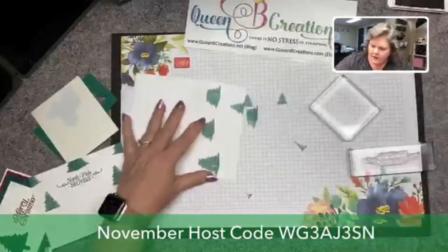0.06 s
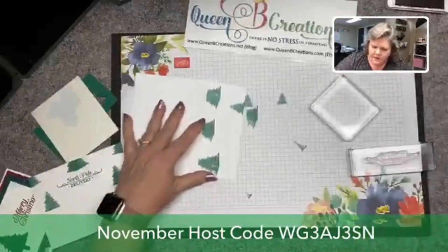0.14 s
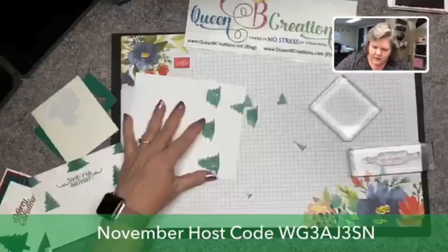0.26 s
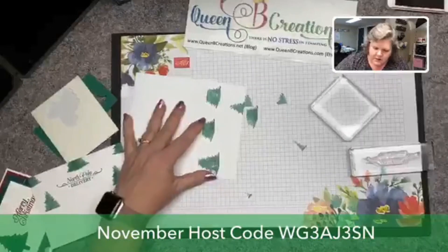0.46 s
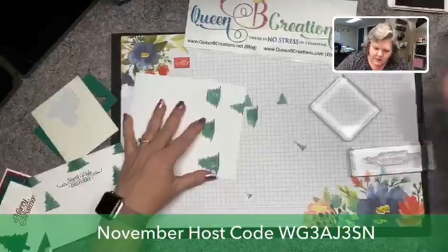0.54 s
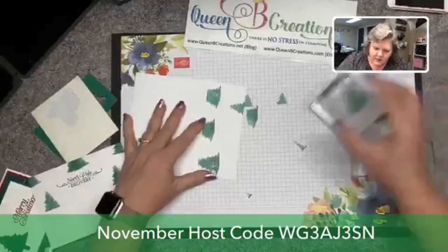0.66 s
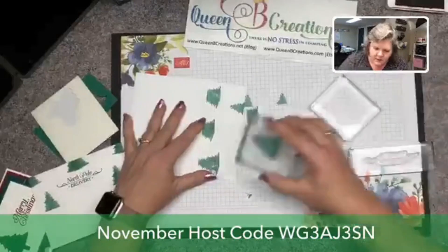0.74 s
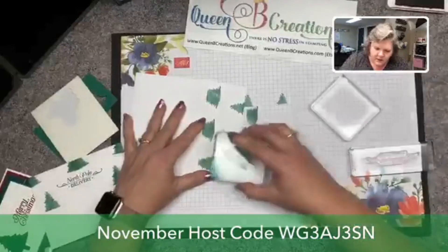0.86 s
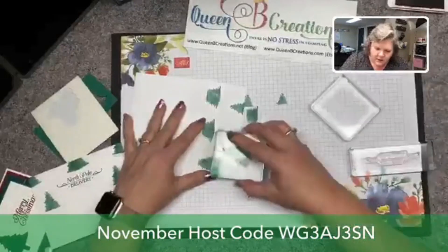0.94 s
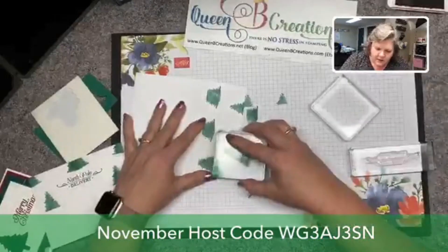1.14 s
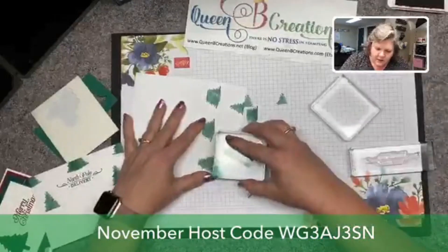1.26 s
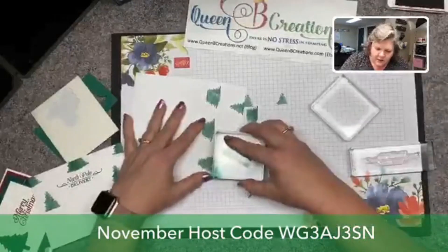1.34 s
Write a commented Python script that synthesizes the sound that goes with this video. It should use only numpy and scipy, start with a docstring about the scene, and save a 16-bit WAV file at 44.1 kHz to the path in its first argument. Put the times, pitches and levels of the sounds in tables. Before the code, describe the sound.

A hard acrylic stamp block thumps and knocks sharply twice on a craft desk, the second with a quick rebound, after faint fingernail ticks; then faint rubbing on paper, small room, close microphone with light hiss.

```python
"""An acrylic stamp block knocks on a craft desk in a small room: a thump that sets the desk wobbling,
then two sharp knocks, the second with a rebound; later it lands softly on paper.
Each contact is a burst of coloured noise with a rattle, plus dying sines for block and desk.
Two fingernail ticks come first, as narrow noise bursts; a faint low rubbing is filtered noise.
The room echo trails the direct sound closely, over steady room tone and microphone hiss."""
import sys
import numpy as np
from scipy import signal
from scipy.fft import rfft, irfft
from scipy.io import wavfile
from scipy.ndimage import uniform_filter1d

SR = 44100
rng = np.random.default_rng(int(sys.argv[2]) if len(sys.argv) > 2 else 0)


def digitize_waveform(pressure):
    """Quantize a signal to 16-bit integers and store it at the path in sys.argv[1].

    Rows of a 2-D input are taken as channels; values are limited to [-1, 1].
    """
    field = np.atleast_2d(pressure).T
    bounded = np.clip(field, -1, 1)
    quanta = np.round(bounded * 32767).astype(np.int16)
    wavfile.write(sys.argv[1], SR, quanta)


N = 61739

# Room tone and microphone hiss. Each row: frequency in Hz, relative density in dB per Hz.
FLOOR_COLOUR = [(15, -19.5), (35, -5.5), (55, 3.5), (130, -1.5), (350, -9), (600, -16), (1500, -17.5),
                (4000, -21), (9000, -26.5), (14500, -34.5), (16000, -34)]
FLOOR_DB = -62.5

# How fast the early echo dies away. Each row: frequency in Hz, decay by 60 dB in seconds.
ROOM_DECAY = [(100, 0.21), (300, 0.4441), (800, 0.1432), (2000, 0.2437), (5000, 0.1), (14000, 0.2328)]
# Colour of the early echo. Each row: frequency in Hz, relative level in dB.
ROOM_COLOUR = [(60, -8), (300, -2.5), (750, 1), (2000, -3), (5000, 2.5), (14000, -4)]
# Colour of the faint late echo. Each row: frequency in Hz, relative level in dB.
LATE_COLOUR = [(200, -22), (750, -26.5), (1100, -23.5), (1650, -20), (2400, -31), (3050, -22), (4500, -26),
               (12000, -47)]
LATE_T60_S = 0.87
ROOM_DB, ROOM_DELAY_S = -6.5, 0.0028  # echo level before each sound's own send, and its lag

# Rumble of the rubbing over time. Each row: time in seconds, level in dB.
RUB_LEVEL = [(0, -78.5), (0.7, -60), (0.85, -66.5), (0.96, -60.5), (1.02, -76.5), (1.1, -61), (1.19, -68),
             (1.301, -68.5), (1.4, -69.5)]
# Colour of that rumble. Each row: frequency in Hz, relative density in dB per Hz.
RUB_COLOUR = [(30, -23), (70, -2), (140, -1.5), (220, -4.5), (300, -4.5), (400, -11), (520, -18.5),
              (1500, -45), (8000, -65.5)]
# Wandering resonance of the rubbing. Each row: time in seconds, centre in Hz, level in dB.
RUB_NOTE = [(0.739, 250, -71), (0.831, 480.2, -70), (0.9, 305.8, -62), (0.959, 162.8, -62),
            (1.01, 139.4, -59), (1.06, 271.8, -64.5), (1.112, 285.5, -64), (1.19, 233, -88),
            (1.27, 280.8, -65), (1.318, 384.4, -66.5), (1.4, 358, -67.5)]
RUB_NOTE_WIDTH_HZ = 52

# Fingernail ticks. Each row: start in seconds, level in dB, centre in Hz, width in octaves.
TICKS = [(0.1285, -30, 3586, 0.18), (0.1290, -43.5, 2500, 0.42), (0.153, -45.5, 1505, 0.62)]
TICK_FALL_S, TICK_SKIRT_DB, TICK_ECHO_DB = 0.0024, -33.5, -7.5

# Slow flexing of the desk top under a push.
# Each row: start in seconds, level in dB, pitch in Hz, hold in seconds, decay by 60 dB in seconds.
PUSHES = [(0.198, -29, 57.7, 0.036, 0.25), (0.313, -47.5, 56.14, 0.058, 0.83),
          (0.493, -42.5, 53.1, .005, .8)]
FLEX_RISE_S = 0.0069

# Modes of the block and what it strikes.
# Each row: frequency in Hz, relative level in dB, decay by 60 dB in seconds.
RING_MODES = [(692, 0, 0.053), (846, -6.5, .05), (895, -0.5, 0.02), (976.5, -4.5, 0.032), (1138, -8, 0.083),
              (1654, 1.5, 0.052), (1837, -8.5, 0.039), (1942, -11, .06), (2710, -1.5, 0.035),
              (2950, -3.5, 0.068), (3470, -2.5, .045), (4055, -7, 0.067)]
# Hollow note of a flat landing. Each row: frequency in Hz, relative level in dB, 60 dB decay in seconds.
HOLLOW_MODES = [(708.4, -8.5, 0.07), (752, 1.5, 0.04), (798, -14, 0.16), (1448, -9.5, 0.063)]
# Desk top modes. Each row: frequency in Hz, relative level in dB, 60 dB decay in seconds.
DESK_MODES = [(86.1, -22, 0.12), (113.9, -5, .17), (135.6, -9.5, .17), (187.5, -6, 0.18), (246, -5, 0.13),
              (275.6, -2, 0.13), (323.5, -6.5, 0.048), (392, -6.5, 0.24), (427.2, -12.5, 0.24)]
MODE_RISE_S, RING_ECHO_DB = 0.00073, -5.5

# Block contacts, the last a soft landing on paper. Each row: start in seconds, contact length in seconds,
# clack level in dB, its mids in dB, its treble in dB, bite in Hz, echo send in dB,
# ring level in dB, hollow level in dB, desk level in dB.
KNOCKS = [(0.2008, 0.004, -31.5, -4.5, -11.5, 3480, -4, -48, -70, -33.5),
          (0.2080, 0.0031, -40.5, -1, -11.5, 2960, 6, -57.5, -60, -50),
          (0.3177, 0.0018, -26, 10, 2, 3040, -4.5, -61, -58.5, -53.5),
          (0.3208, 0.0041, -18, 1, 2, 3030, -0.5, -20, -36.5, -43),
          (0.3247, 0.0036, -23, 7, -4, 3400, 0.5, -48.5, -25, -30),
          (0.4799, 0.0046, -29.5, -2.5, -14.5, 1900, -0.5, -47, -46, -45),
          (0.4844, 0.0032, -20.5, -2.5, 2, 3930, -0.5, -38.5, -38, -33),
          (0.4874, 0.00063, -26, 6, -9.5, 4000, -0.5, -44.5, -13.5, -33.5),
          (0.5091, 0.0071, -26.5, 8, -2, 3480, 0, -41.5, -32, -28.5),
          (0.9925, 0.0046, -61.5, -2, -8, 2900, 4, -65, -73, -61.5)]
# Basic colour of the contact clack. Each row: frequency in Hz, relative density in dB per Hz.
CLACK_COLOUR = [(40, -30), (120, 2), (400, 2), (500, -17), (680, 3.5), (900, 2.5), (1100, -5), (1650, -0.5),
                (2300, -6), (2800, -1.5), (4000, -2.5), (5500, -3.5), (8000, -9), (13000, -12.5),
                (16000, -21.5)]
CONTACT_RISE_S, CLACK_FALL_S = 0.0005, 0.0017
TREBLE_FROM_HZ, MIDS_HZ, MIDS_OCTAVES = 4140, 1060, 1.5
BITE_DB, BITE_OCTAVES = 5.5, 0.13  # a narrow band of the upper mids, stressed by each contact point
EVENNESS = 0.83  # how evenly a contact excites all frequencies, 0 to 1
RATTLE_DB, RATTLE_FALL_S, RATTLE_SPREAD_DB = -15, 0.021, 4

BASS_CUT_HZ, TOP_EDGE_HZ = 39, 15950  # microphone roll-off and band limit


def amp(db):
    """Decibels to gain."""
    return 10 ** (np.asarray(db) / 20)


def read(points, hz):
    """Reads a table on a log-frequency axis."""
    f, value = np.transpose(points)
    return np.interp(np.log(hz + 1), np.log(f), value)


def add(mix, s, sound):
    """Mixes a sound in at a given time in seconds."""
    part = mix[max(round(s * SR), 0):][:len(sound)]
    part += sound[:len(part)]


def noise(colour, size):
    """Noise of unit level: the spectrum of a table with random phases."""
    hz = np.fft.rfftfreq(size, 1 / SR)
    phase = 2 * np.pi * rng.random(len(hz))
    x = irfft(np.exp(1j * phase) * amp(read(colour, hz)), size)
    return x / x.std()


def modes(table, rise_s):
    """Dying sines, struck together: each mode dies away at its own rate."""
    t = np.arange(SR) / SR
    out = np.zeros(SR)
    for hz, db, t60 in table:
        out += amp(db - 60 * t / t60) * np.sin(2 * np.pi * hz * t)
    return (1 - np.exp(-t / rise_s)) * out


def chatter(level, count=2):
    """Tiny random contacts that follow an envelope and excite all frequencies fairly evenly."""
    x = level * rng.choice([-1, 1], len(level))
    for _ in range(count):
        # Flatten the spectrum, then restore the envelope.
        spectrum = rfft(x)
        x = irfft(spectrum / (abs(spectrum) + 1e-12) ** EVENNESS)
        local_power = abs(uniform_filter1d(x ** 2, size=32))
        x = x * level / np.sqrt(local_power + 1e-18)
    return x


def rattle(size):
    """Envelope of uneven tiny contacts that die away as the loose block settles."""
    t = np.arange(size) / SR
    wander = np.interp(t, np.linspace(0, t[-1], 100), rng.standard_normal(100))
    return amp(RATTLE_DB) * amp(RATTLE_SPREAD_DB * wander) * np.exp(-t / RATTLE_FALL_S)


def burst(colour_db, hold_s, fall_s, loose=False, size=4096):
    """A short chatter of contact (quick rise, hold, fall; a rattle if loose) through a colour filter."""
    t = np.arange(size) / SR
    level = np.exp(-np.maximum(t - hold_s, 0) / fall_s)
    if loose:
        level = np.hypot(level, rattle(size))
    level = level * (1 - np.exp(-t / CONTACT_RISE_S))
    # Minimum phase keeps the filter causal.
    hz = abs(np.fft.fftfreq(size, 1 / SR)) + 1
    log_gain = np.log(amp(colour_db(hz)))
    body = np.fft.ifft(np.exp(np.conj(signal.hilbert(log_gain)))).real[:size // 2]
    return signal.fftconvolve(chatter(level), body / np.linalg.norm(body))


def room_floor():
    """Steady room tone and microphone hiss: stationary coloured noise."""
    return amp(FLOOR_DB) * noise(FLOOR_COLOUR, size=N)


def room(x, send_db=0):
    """A sound with its echo: dense reflections with a decay set by frequency, and a faint late tail."""
    hz, t, z = signal.stft(rng.choice([-1., 1.], SR), SR, nperseg=256)
    early = amp(read(ROOM_COLOUR, hz)[:, None] - 60 * t / read(ROOM_DECAY, hz)[:, None])
    late = amp(read(LATE_COLOUR, hz)[:, None] - 60 * t / LATE_T60_S)
    tail = signal.istft(z * np.hypot(early, late), SR, nperseg=256)[1]
    echo = signal.fftconvolve(x, tail / np.linalg.norm(tail))
    out = np.zeros(N)
    add(out, 0, x)
    add(out, ROOM_DELAY_S, amp(ROOM_DB + send_db) * echo)
    return out


def rubbing():
    """Dull friction of hand and block on the paper: a low rumble and a broad wandering resonance."""
    t = np.arange(N) / SR
    rumble = noise(RUB_COLOUR, size=N) * amp(np.interp(t, *np.transpose(RUB_LEVEL)))
    # Slow complex noise, shifted up to the moving centre, makes the resonance.
    s, hz, db = np.transpose(RUB_NOTE)
    lowpass = signal.butter(2, RUB_NOTE_WIDTH_HZ / 2, fs=SR, output="sos")
    grain = signal.sosfilt(lowpass, rng.standard_normal((N, 2)) @ [1, 1j])
    phase = 2 * np.pi * np.cumsum(np.interp(t, s, hz)) / SR
    note = (grain * np.exp(1j * phase)).real
    note_level = amp(np.interp(t, s, db)) * (t > s[0])
    return rumble + note / note.std() * note_level


def fingernails():
    """Tiny narrow-band ticks as the fingers take hold."""
    out = np.zeros(N)
    for s, db, centre_hz, width in TICKS:
        def band(hz):
            """A flat-topped band that falls to a low skirt."""
            return np.maximum(-4 * (np.log2(hz / centre_hz) / width) ** 4, TICK_SKIRT_DB)
        add(out, s, amp(db) * burst(band, 0, TICK_FALL_S))
    return out


def flexing():
    """The desk top wobbles slowly while it is pushed, then settles as a dying low sine."""
    out, t = np.zeros(N), np.arange(SR) / SR
    for s, db, hz, hold_s, t60 in PUSHES:
        level = amp(db - 60 * np.maximum(t - hold_s, 0) / t60)
        rise = 1 - np.exp(-t / FLEX_RISE_S)
        add(out, s, -level * rise * np.sin(2 * np.pi * hz * t))
    return out


def ringing():
    """Each contact rings the modes of block and desk, and the hollow note, in its own balance."""
    out = np.zeros(N)
    ring, hollow, desk = (modes(table, MODE_RISE_S) for table in (RING_MODES, HOLLOW_MODES, DESK_MODES))
    for s, *_, ring_db, hollow_db, desk_db in KNOCKS:
        add(out, s, amp(ring_db) * ring + amp(hollow_db) * hollow + amp(desk_db) * desk)
    return out


def clack_colour(hz, mids_db, treble_db, bite_hz):
    """A sharp edge gives more treble, a flat face more mids; the bite moves with the point of contact."""
    mids = np.exp(-(np.log2(hz / MIDS_HZ) / MIDS_OCTAVES) ** 4)
    treble = 1 / (1 + (TREBLE_FROM_HZ / hz) ** 12)
    bite = np.exp(-(np.log2(hz / bite_hz) / BITE_OCTAVES) ** 2)
    return read(CLACK_COLOUR, hz) + mids_db * mids + treble_db * treble + BITE_DB * bite


def clacks():
    """The hard noise of each contact and its loose rattle, each with its own echo."""
    out = np.zeros(N)
    for s, length, db, mids_db, treble_db, bite_hz, echo_db, *_ in KNOCKS:
        def colour(hz):
            """The colour of this contact."""
            return clack_colour(hz, mids_db, treble_db, bite_hz)
        clack = burst(colour, length, CLACK_FALL_S, loose=True)
        add(out, s, amp(db) * room(clack, send_db=echo_db))
    return out


def scene():
    """The desk sounds in their room, over the steady floor; rubbing and flexing stay without echo."""
    ticks = room(fingernails(), send_db=TICK_ECHO_DB)
    knocks = clacks() + room(ringing(), send_db=RING_ECHO_DB) + flexing()
    return (room_floor() + rubbing() + ticks + knocks)[None]


def record(dry):
    """The microphone's bass roll-off and the band limit."""
    bass_cut = signal.butter(6, BASS_CUT_HZ, "high", fs=SR, output="sos")
    band_limit = signal.firwin(255, TOP_EDGE_HZ, window=("kaiser", 8), fs=SR)
    return signal.oaconvolve(signal.sosfilt(bass_cut, dry), band_limit[None], "same")


dry = scene()
out = record(dry)
digitize_waveform(out)
```